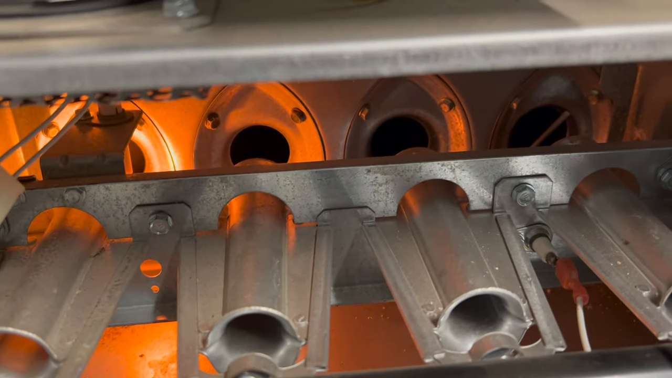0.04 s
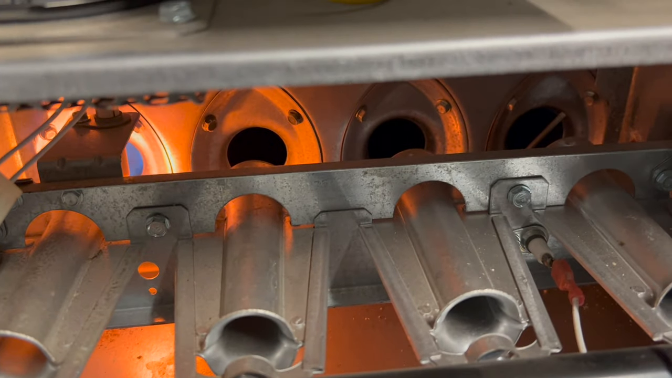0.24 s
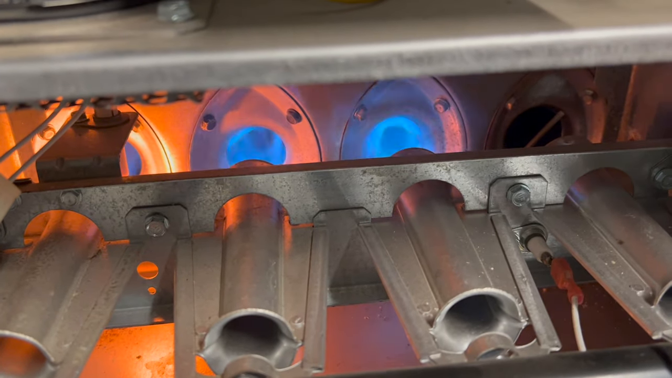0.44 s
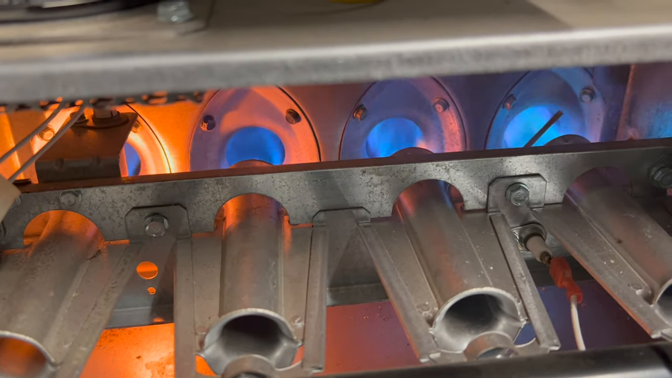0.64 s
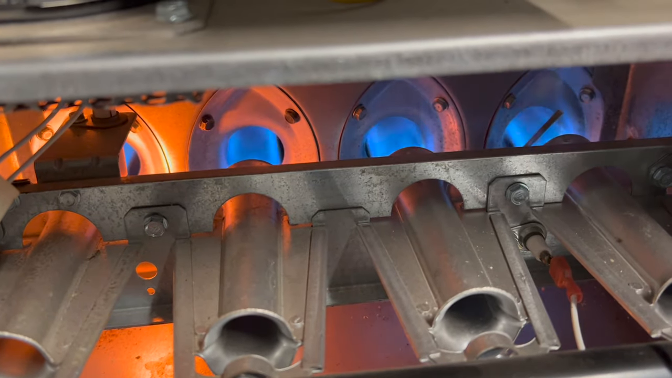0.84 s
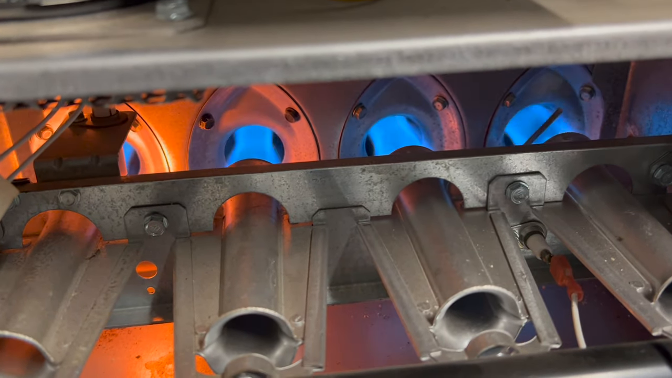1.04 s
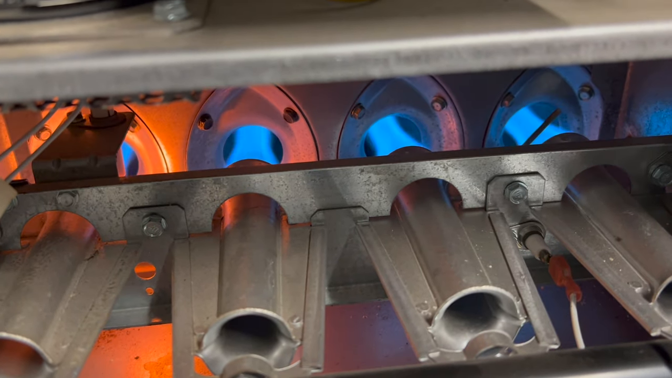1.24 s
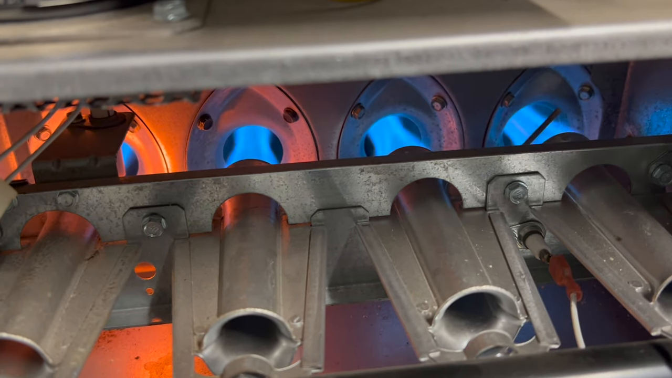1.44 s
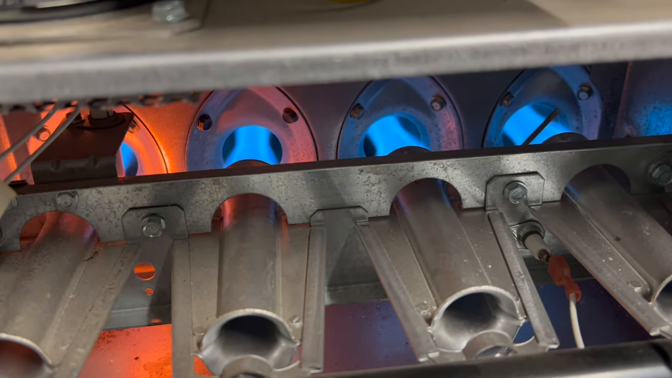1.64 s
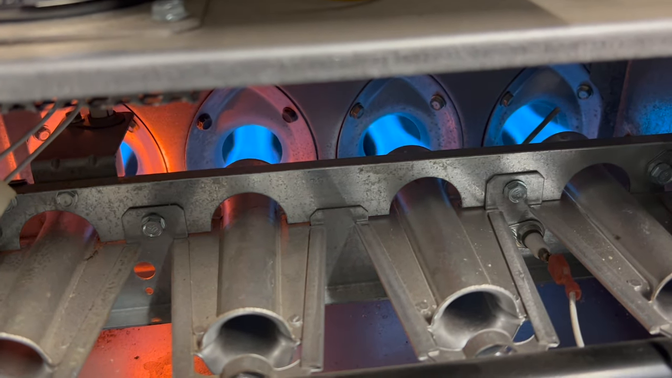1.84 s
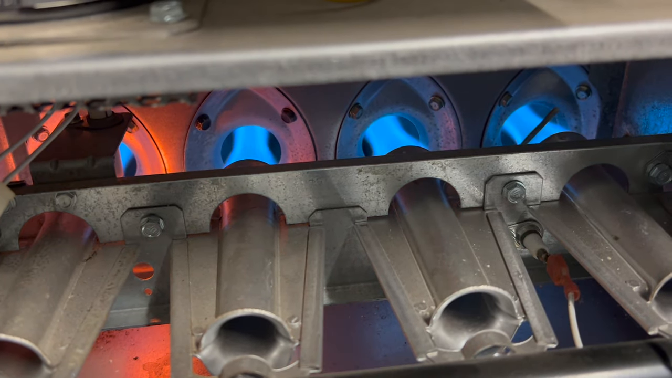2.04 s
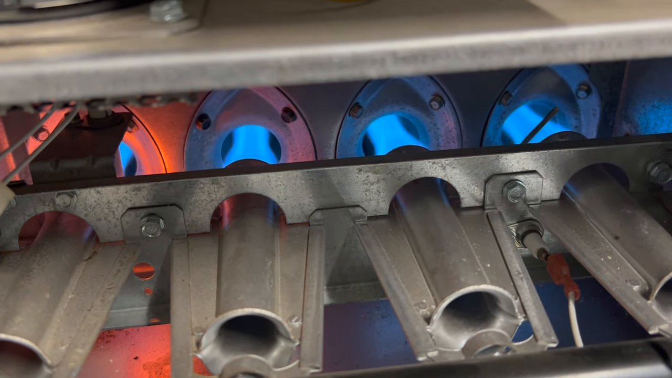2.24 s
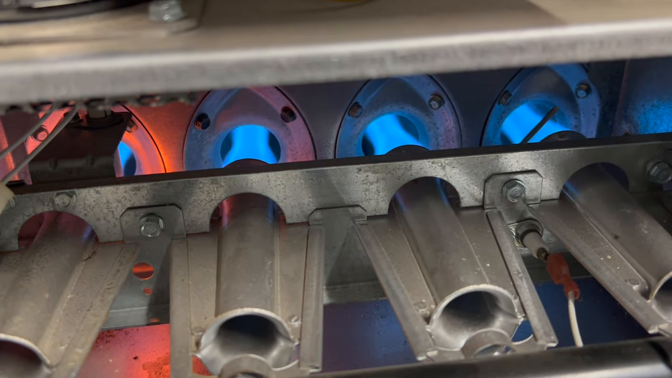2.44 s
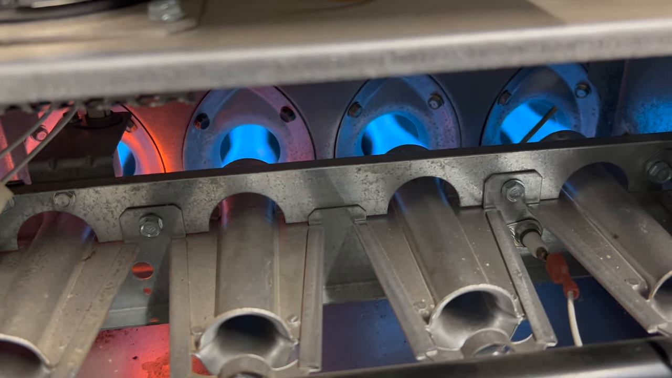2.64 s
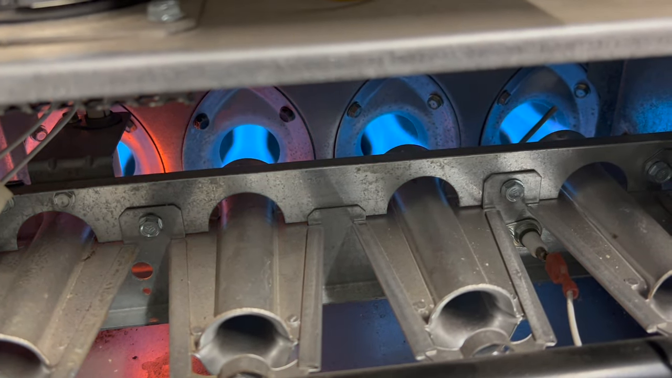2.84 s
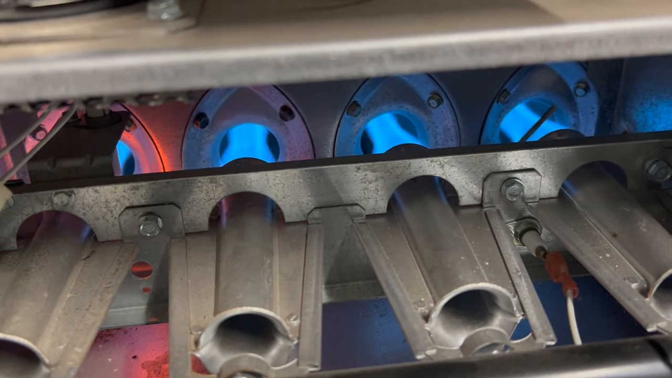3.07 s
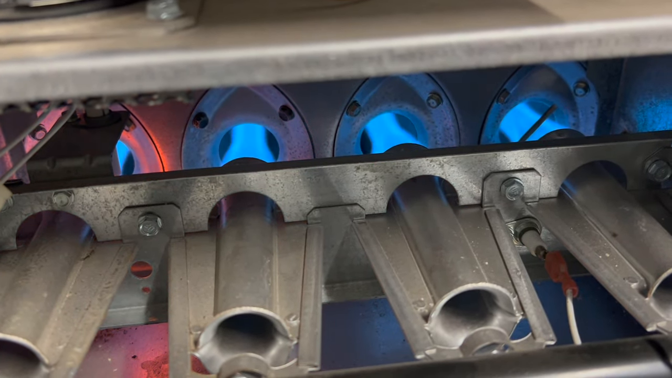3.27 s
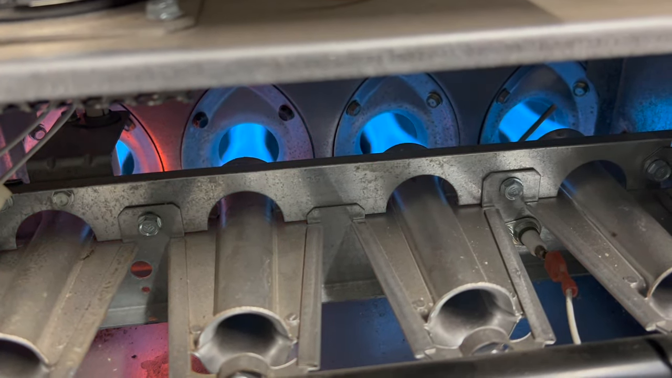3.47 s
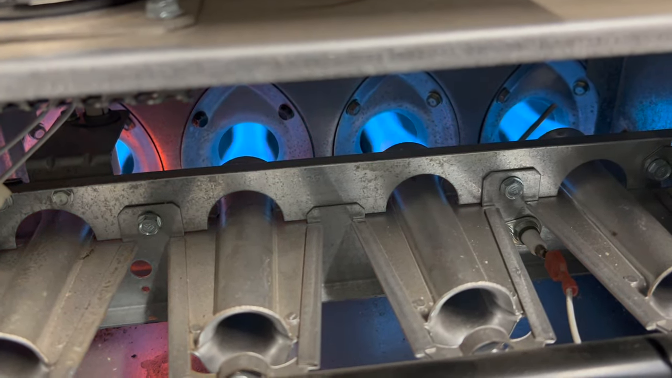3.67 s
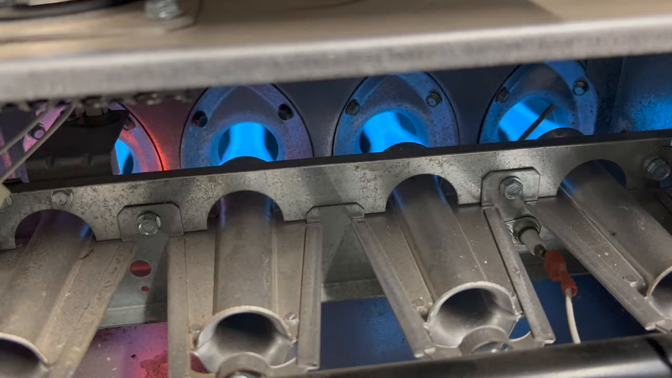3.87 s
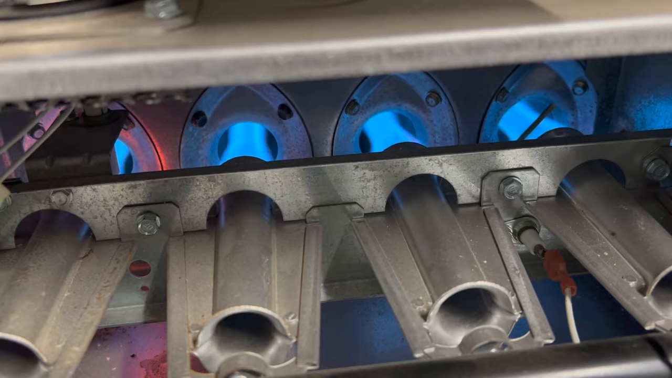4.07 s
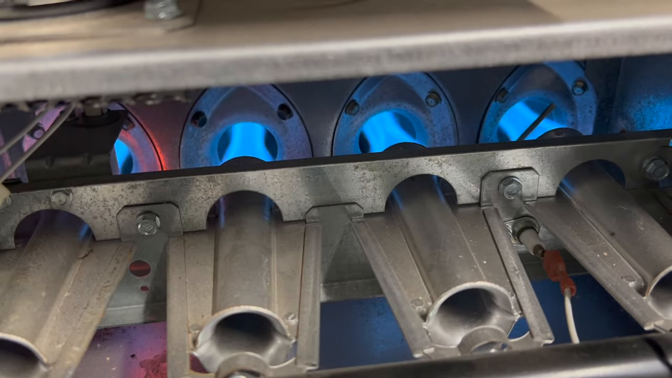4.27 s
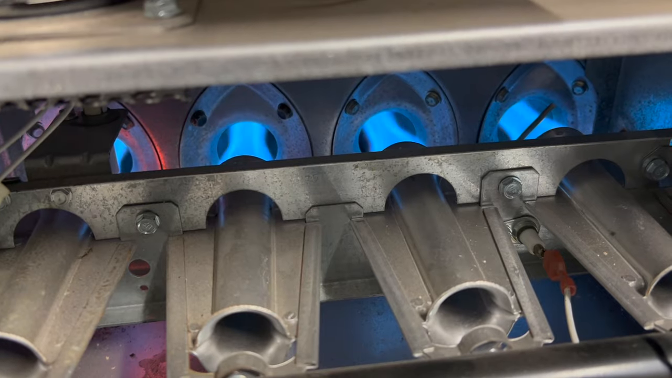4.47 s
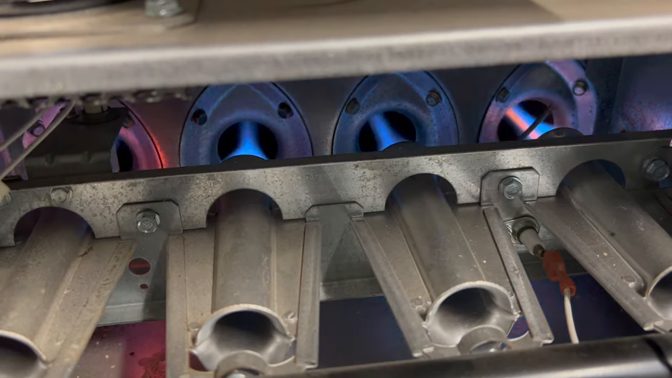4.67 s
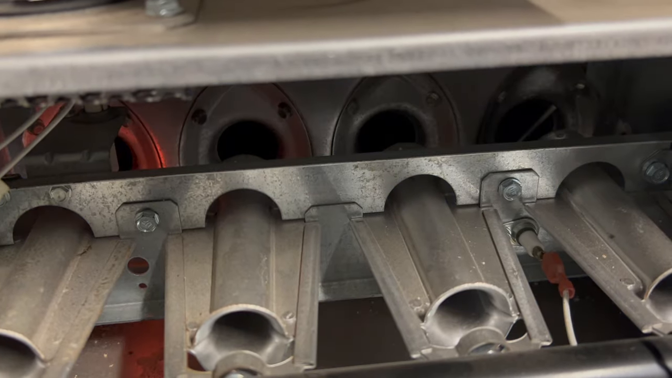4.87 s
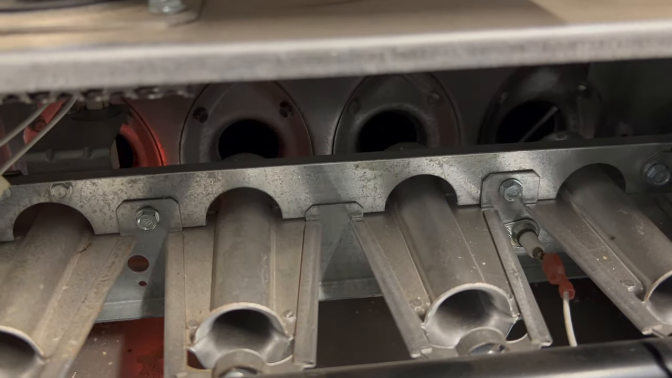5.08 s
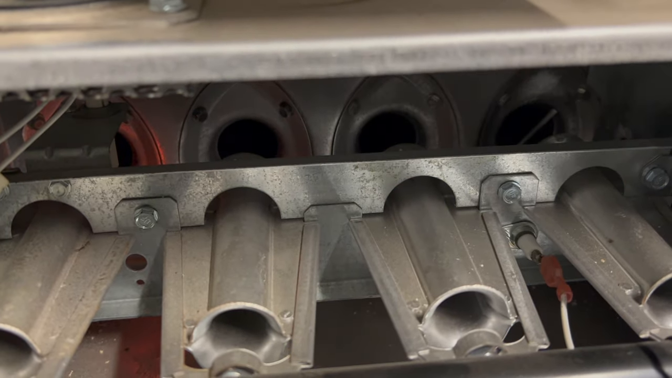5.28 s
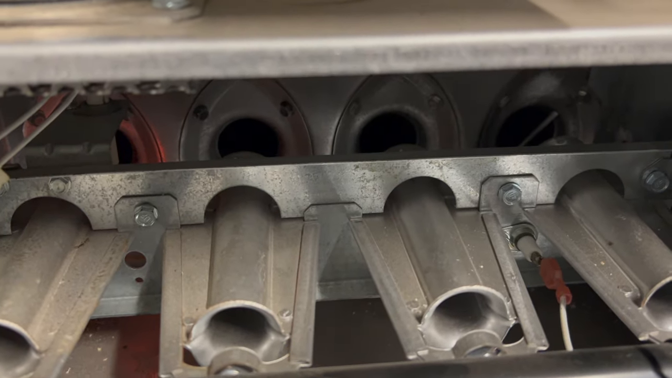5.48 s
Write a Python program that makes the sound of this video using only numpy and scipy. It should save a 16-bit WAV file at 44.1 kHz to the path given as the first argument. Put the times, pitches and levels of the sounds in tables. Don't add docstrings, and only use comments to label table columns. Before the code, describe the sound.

Close handheld stereo microphone at a furnace cabinet: constant low motor hum and airy fan noise, a small metal knock, then a rapid run of soft whoomps as burners light. The fire settles into a bassy, fluttering roar with a thin beating whistle and slight hiss. It ends suddenly with a click and clank; fan noise continues with faint ticks.

```python
import sys
import numpy as np
from scipy import signal
from scipy.fft import rfft, irfft, next_fast_len
from scipy.io import wavfile
from scipy.ndimage import uniform_filter1d, map_coordinates

SR = 44100
rng = np.random.default_rng(int(sys.argv[2]) if len(sys.argv) > 2 else 0)


def gain_from_db(level_db):
    decades = np.asarray(level_db, float) / 20
    return 10 ** decades


def log_audio(samples):
    frames = np.atleast_2d(samples).T
    limited = np.clip(frames, -1, 1)
    pcm = np.round(limited * 32767).astype(np.int16)
    wavfile.write(sys.argv[1], SR, pcm)


N = 242991
T = np.arange(N) / SR


def unit(x):
    return x / np.sqrt(np.mean(x ** 2) + 1e-20)


def along(points, hz):
    f, v = np.transpose(points)
    return np.interp(np.log(hz + 1), np.log(f + 1), v)


def level_curve(rows):
    s, db = np.transpose(rows)
    return gain_from_db(np.interp(T, s, db, left=-120, right=-120))


def ramp(start_s, rise_s):
    return np.clip((T - start_s) / rise_s, 0, 1)


def wobble(rate_hz):
    knots = rng.standard_normal(int(N * rate_hz / SR) + 4)
    return map_coordinates(knots, [T * rate_hz])


def filtered(x, response):
    m = next_fast_len(N + 8192)
    return irfft(rfft(x, m) * response(np.fft.rfftfreq(m, 1 / SR)), m)[..., :N]


def peaks(modes, hz):
    return sum(gain_from_db(2 * db) / (1 + (2 * (hz - centre) / width) ** 2) for centre, width, db in modes)


def rush(response, patchy_db):
    z = signal.stft(rng.standard_normal((2, N)), nperseg=256)[2]
    field = uniform_filter1d(rng.standard_normal(z.shape[1:]), size=12, axis=0)
    field = uniform_filter1d(field, size=8, axis=1)
    patchy = signal.istft(z * gain_from_db(patchy_db * unit(field)), nperseg=256)[1][:, :N]
    return unit(filtered(patchy, response))


def struck(start_s, db, t60_s, attack_s):
    t = np.maximum(T - start_s, 0)
    return gain_from_db(db - 60 * t / t60_s) * (1 - np.exp(-t / attack_s))


# time_s, level_db
BURNING = [(.1, -40), (.18, -24.5), (.26, -27.5), (.62, -25), (.8, -29), (.88, -27), (.93, -20),
           (1.08, -25.5), (1.16, -19.5), (1.41, -21.5), (1.48, -26), (1.72, -20.5), (2.1, -23.5),
           (2.45, -23), (3.0, -24.5), (3.4, -23), (3.9, -25.5), (4.66, -24.5)]


def heat_db():
    return np.interp(T, *np.transpose(BURNING), left=-120)


def dying_db(rate_db_per_s):
    return rate_db_per_s * np.maximum(T - 4.7, 0)


# freq_hz, density_db (per Hz)
FLAME_COLOUR = [(90, -12.5), (150, -4), (250, -6), (330, -15), (500, -11), (850, -16.5), (1300, -21.5),
                (1430, -28), (1930, -30.5), (2600, -30), (3200, -40.5), (4500, -80), (6600, -120)]
# freq_hz, width_hz, lift_db
TUBE_MODES = [(251, 30.4, 8), (420, 63.5, 11), (692.3, 14, 12), (1087, 200, 5.5), (1308, 10.6, 12),
              (1400, 15, 4.5), (1573, 27, 12.5)]


def roar():
    broad = rush(lambda hz: gain_from_db(along(FLAME_COLOUR, hz)), patchy_db=1.37)
    loose, full = 0.37, 1.11
    share = loose + (full - loose) * ramp(0.56, rise_s=0.84)
    singing = share * filtered(broad, lambda hz: np.sqrt(1 + peaks(TUBE_MODES, hz)) - 1)
    flicker = gain_from_db(-4.0 + 0.61 * wobble(14))
    return gain_from_db(heat_db() - dying_db(70)) * flicker * (broad + singing)


# freq_hz, width_hz, level_db
EXCHANGER_MODES = [(62, 13, -4), (84.2, 31.5, 1), (123.3, 64, -6.5), (146, 12, -6.5)]
# centre_s, depth_db, half_width_s
FALTERS = [(1.0, 5, 0.15), (1.52, 5.5, 0.12), (1.75, 4, .025), (1.86, 3.5, 0.046), (2.09, 6, 0.014),
           (2.2, 4, 0.051), (2.58, 5, 0.018), (2.72, 9, 0.029), (2.84, 17, 0.023), (3.0, 3.5, 0.035),
           (3.19, 2.5, 0.058), (3.38, 9, 0.025), (3.469, 15, 0.022), (3.56, 3, 0.012), (3.94, 4, 0.028),
           (4.14, 7, 0.024), (4.36, 7.5, 0.039), (4.49, 8, 0.015), (4.63, 4.5, 0.05)]


def rumble():
    low = rush(lambda hz: peaks(EXCHANGER_MODES, hz) ** 0.92, patchy_db=0.0)
    swell = np.sqrt(np.abs(uniform_filter1d(low[0] ** 2, size=2600)) + 0.022)
    steadied = unit(low / swell ** 0.46)
    lulls_db = sum(db * np.exp(-((T - s) / half) ** 2) for s, db, half in FALTERS)
    loose_db, drawn_db = -24.5, -10.5
    level_db = loose_db + (drawn_db - loose_db) * ramp(0.884, rise_s=0.05)
    level_db = level_db + 0.33 * (heat_db() - BURNING[-1][1])
    return gain_from_db(level_db - lulls_db - dying_db(222)) * steadied


def whistle():
    beat_hz, null_s, second_tube = 3.68, 3.0, 0.69
    beat = np.abs(1 - second_tube * np.exp(2j * np.pi * beat_hz * (T - null_s)))
    level = ramp(1.03, rise_s=0.81) * beat * gain_from_db(-40.5 + 1.5 * wobble(9) - dying_db(70))
    phase = 2 * np.pi * 1027 * T + 1.0 * wobble(14) + np.array([[0], [1.5]])
    return level * gain_from_db(6.5) * np.sin(phase)


# start_s, ring_db, ring_hz, thump_db, thump_hz
LIGHTINGS = [
    (.220, -14, 246, -13, 75),
    (.317, -7, 285, -4.5, 62),
    (.424, -14.5, 308, -6, 84.6),
    (.540, -7, 214, -6.5, 66),
]


def puffs():
    sound = np.zeros((2, N))
    for s, ring_db, ring_hz, thump_db, thump_hz in LIGHTINGS:
        ring = np.sin(2 * np.pi * ring_hz * (T - s))
        sound[0] += struck(s, ring_db + 5.5, 0.06, attack_s=0.0048) * ring
        late_s = s + 0.0085
        thump = np.sin(2 * np.pi * thump_hz * (T - late_s))
        sound[0] -= struck(late_s, thump_db + 11.5, 0.061, attack_s=0.0027) * thump
    return sound


# start_s, boom_db, t60_s (of all three parts), clank_db, crack_db
BLOWS = [
    (0.133, -27, 0.13, -29, -40),
    (0.149, -21.5, 0.43, -34, -46),
    (0.314, -15, 0.05, -22, -32.5),
    (0.417, -19, 0.11, -24.5, -37.5),
    (0.536, -21.5, 0.07, -24.5, -35),
    (4.676, -24, 0.087, -21.5, -34),
    (4.682, -14.5, 0.079, -21, -40),
]
# freq_hz, width_hz, level_db
PANEL_MODES = [(301, 65, 3), (457, 47, -3)]
# freq_hz, width_hz, level_db
BRACKET_MODES = [(640, 106, 3.5), (833, 50, 4), (1030, 140, 2.5), (1262, 190, -0.5), (2290, 100, -11)]
# freq_hz, density_db (per Hz)
CRACK_COLOUR = [(600, -23), (1600, 1.5), (3500, -4.5), (8000, -12), (15500, -19)]


def knocks():
    boom = rush(lambda hz: peaks(PANEL_MODES, hz) ** 0.93, patchy_db=1.5)
    clank = rush(lambda hz: peaks(BRACKET_MODES, hz) ** 0.93, patchy_db=1.5)
    crack = rush(lambda hz: gain_from_db(along(CRACK_COLOUR, hz)), patchy_db=1.5)
    sound = np.zeros((2, N))
    for s, boom_db, t60_s, clank_db, crack_db in BLOWS:
        for db, steel in ((boom_db, boom), (clank_db, clank), (crack_db, crack)):
            sound += struck(s, db + 5, t60_s, attack_s=0.002) * steel
    return sound


# time_s, level_db
HISS_LEVEL = [(.08, -57), (.12, -56), (.14, -51), (.31, -46), (.62, -47.5), (.67, -51), (1.08, -45),
              (2.4, -45.5), (4.62, -46.5), (4.65, -41.5), (4.66, -50), (4.69, -46), (4.73, -72),
              (4.74, -64)]
# freq_hz, density_db (per Hz)
JET_COLOUR = [(2000, -14), (3000, 0), (3600, 0), (4400, 1), (4650, -4), (6800, -3.5), (8200, -3),
              (9900, -1.5), (11000, 2.5), (12600, 2.5), (13900, -3), (14500, 0), (15200, -4)]
# freq_hz, width_hz, lift_db
NOZZLE_MODES = [(4100, 600, 3), (5850, 480, 11), (7560, 380, 10), (8980, 600, 9)]


def jets():
    def colour(hz):
        return gain_from_db(along(JET_COLOUR, hz)) * np.sqrt(1 + peaks(NOZZLE_MODES, hz)) * (hz > 1500)
    hiss = rush(colour, patchy_db=0.97)
    flutter = gain_from_db(4 + 0.33 * wobble(11) + 0.18 * wobble(40))
    return level_curve(HISS_LEVEL) * flutter * hiss


# start_s, level_db, freq_hz, width_hz, t60_s
SMALL_TICKS = [
    (.137, -42, 3650, 300, .2),
    (1.29, -32, 1245, 30, .5),
    (1.31, -29, 1027, 25, .5),
    (4.634, -22, 1470, 90, .1),
    (4.643, -34, 6000, 6000, .07),
    (4.703, -35, 9000, 9000, .03),
    (4.818, -44, 11000, 12000, .06),
    (4.82, -47, 5200, 600, .08),
]


def ticks():
    white = rng.standard_normal((2, N))
    sound = np.zeros((2, N))
    for s, db, hz, width, t60_s in SMALL_TICKS:
        metal = unit(filtered(white, lambda f: peaks([(hz, width, 0)], f) * f / (f + 2000)))
        sound += struck(s, db, t60_s, attack_s=0.00068) * metal
    return sound


# time_s, level_db
FAN_LEVEL = [(0, -22.5), (.6, -22.5), (1.2, -26.5), (3, -25), (4.7, -24.5), (5, -23), (5.51, -24.5)]
# freq_hz, density_db (per Hz)
AIR_COLOUR = [(25, -24), (57, 1.5), (75, -1.5), (110, -1), (170, -10), (330, -13), (850, -23),
              (1020, -30.5), (1450, -31.5), (1900, -28.5), (2900, -36.5), (5000, -48), (9000, -53.5),
              (12000, -100)]
# freq_hz, width_hz, lift_db
HOUSING_MODES = [(216, 58, 0.5), (294, 55, 2.5), (1130, 550, 6), (1570, 54, 11)]
# pitch_hz, level_db (over the fan level)
SHAFT_TONES = [(57.5, -9), (1143, -27), (1201, -22.5), (1264, -29), (1920, -32), (2067, -36), (2214, -34)]
# freq_hz, width_hz, level_db
WHINE_MODES = [(12640, 90, -4), (12900, 410, -16), (12200, 5900, -20)]


def fan():
    def colour(hz):
        return gain_from_db(along(AIR_COLOUR, hz)) * np.sqrt(1 + peaks(HOUSING_MODES, hz))
    sound = rush(colour, patchy_db=1.0)
    for hz, db in SHAFT_TONES:
        phase = 2 * np.pi * hz * T + 0.57 * wobble(5) + rng.uniform(0, 2 * np.pi, (2, 1))
        sound = sound + gain_from_db(db + 4.5 + 1.9 * wobble(3.77)) * np.sin(phase)
    whine = rush(lambda hz: np.sqrt(peaks(WHINE_MODES, hz)) * (hz > 9000), patchy_db=1.5)
    return level_curve(FAN_LEVEL) * (sound + gain_from_db(-33.5) * whine)


def scene():
    return roar() + rumble() + whistle() + puffs() + knocks() + jets() + ticks() + fan()


# freq_hz, right_lead_rad
RIGHT_LEAD = [(900, 0), (1600, -1.7), (1720, 0), (2750, -.7), (4400, 0), (5500, .6), (6600, 0), (7400, .1),
              (8300, 1.1), (9450, np.pi), (10400, np.pi), (12350, 2 * np.pi), (13900, 2 * np.pi),
              (15100, 3 * np.pi)]
# freq_hz, likeness (0 to 1)
LIKENESS = [(60, .999), (380, .96), (900, .68), (1600, .62), (1750, .96), (3300, .68), (4200, .85),
            (5200, .4), (6900, 1), (8200, .65), (9400, 1), (10300, 1), (11200, .8), (12300, 1)]
# freq_hz, left_over_right_db
BALANCE = [(40, .4), (85, 1), (150, 3.2), (300, -.2), (1400, -.5), (3000, 3), (5500, 0)]


def ports(hz):
    turn = np.arccos(np.clip(along(LIKENESS, hz), 0, 1)) / 2
    lead = np.exp(.5j * along(RIGHT_LEAD, hz)) * gain_from_db(-along(BALANCE, hz) / 2)
    left = [np.cos(turn) / lead, np.sin(turn) / lead]
    right = [np.cos(turn) * lead, -np.sin(turn) * lead]
    bass_cut = 1 / np.sqrt(1 + (48 / (hz + 1)) ** 6)
    return np.array([left, right]) * (hz < 15780) * bass_cut


def roll_off(x):
    return signal.sosfilt(signal.butter(12, 15660, fs=SR, output="sos"), x)


def record(dry):
    pair = filtered(dry, ports).sum(axis=1)
    limited = pair / (1 + np.abs(pair / 1.1) ** 5) ** (1 / 5)
    return roll_off(limited)


dry = scene()
out = record(dry)
log_audio(out)
```